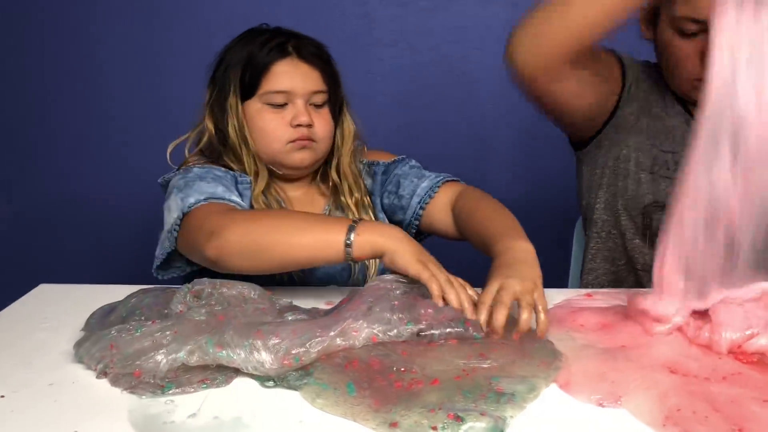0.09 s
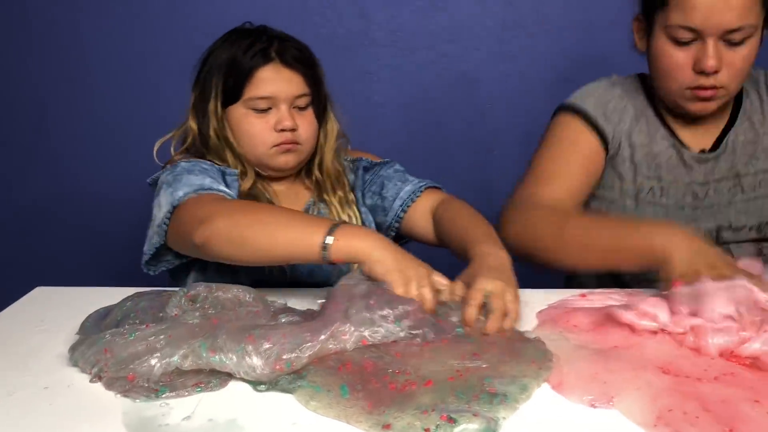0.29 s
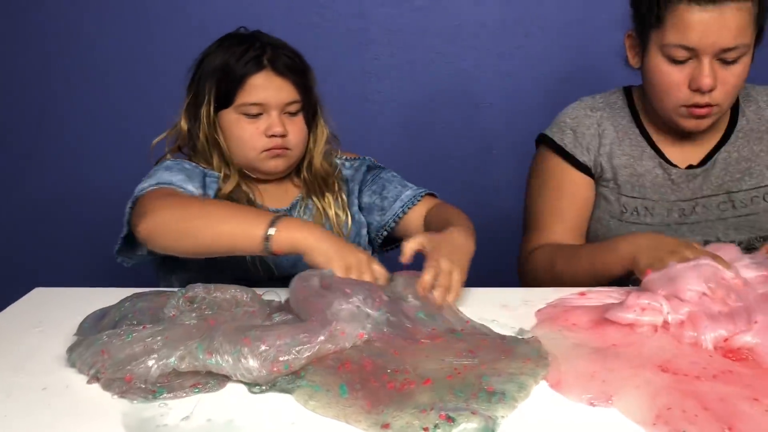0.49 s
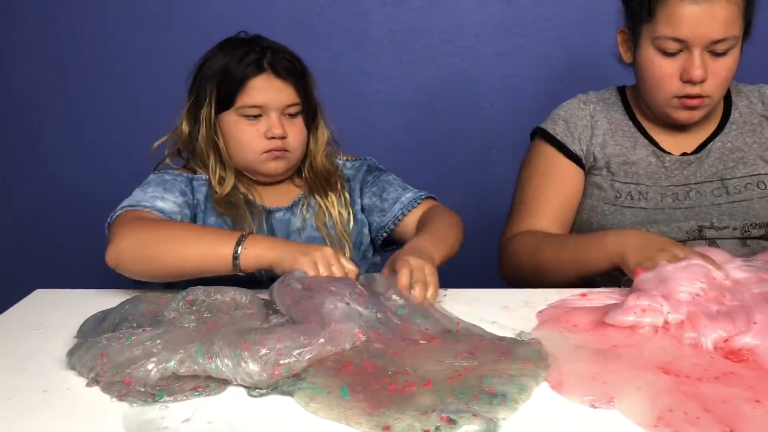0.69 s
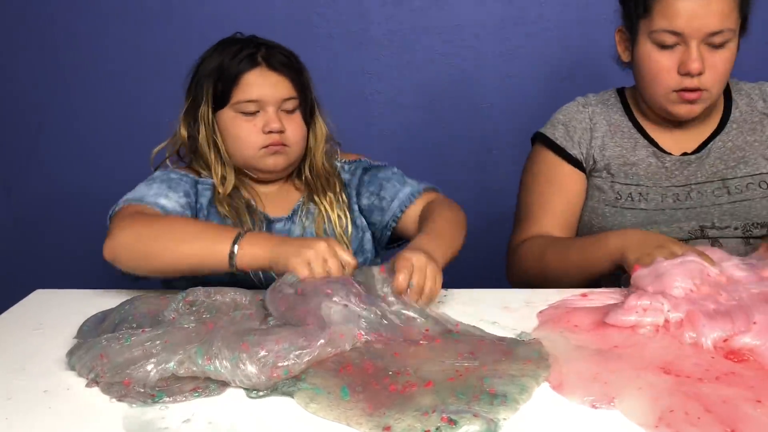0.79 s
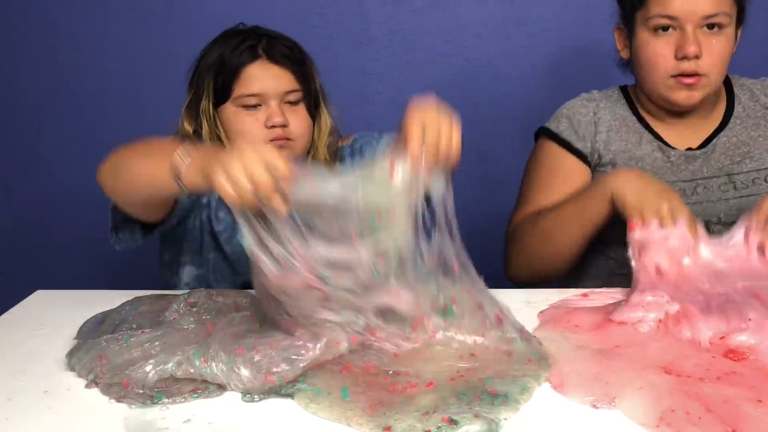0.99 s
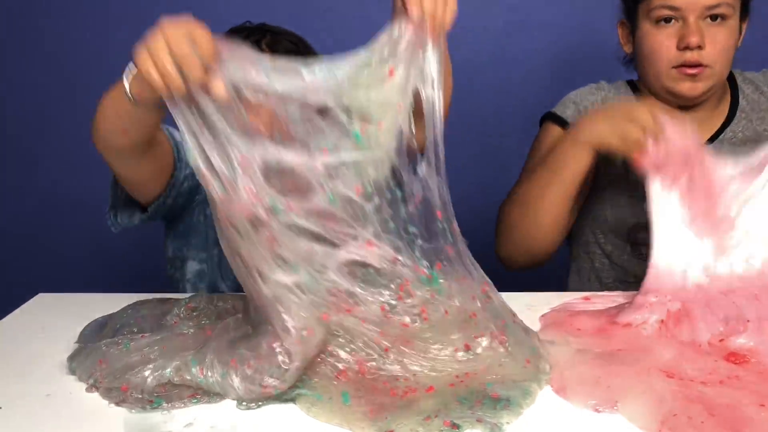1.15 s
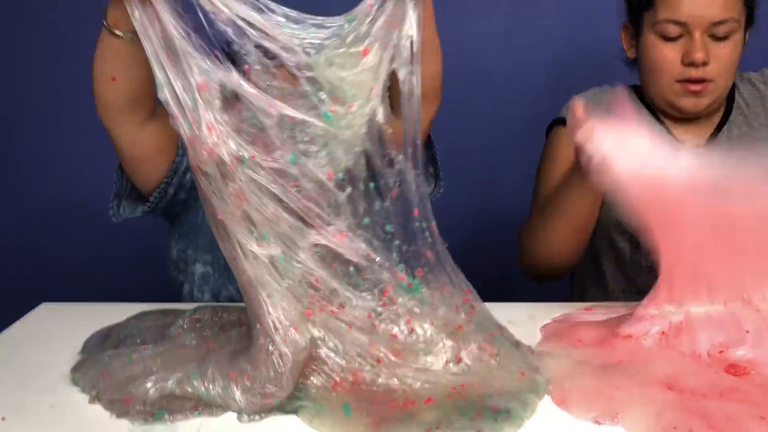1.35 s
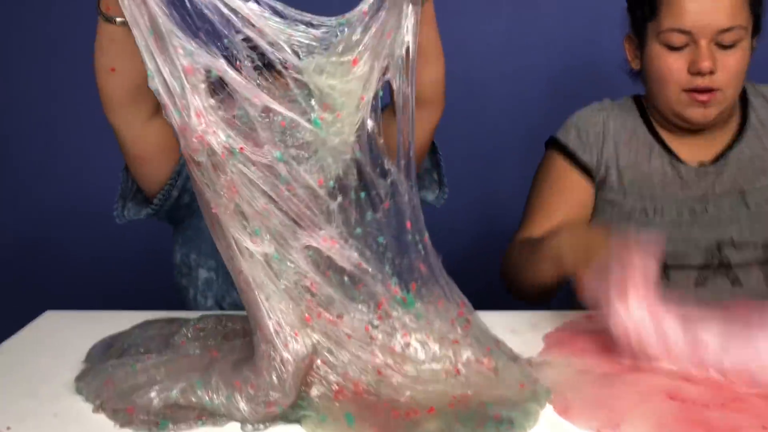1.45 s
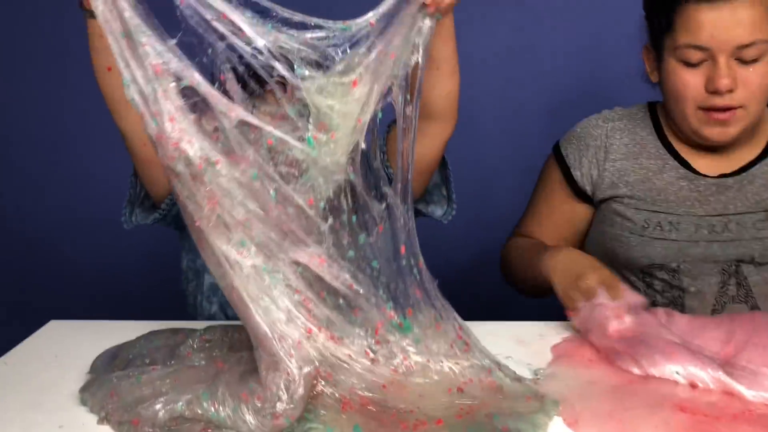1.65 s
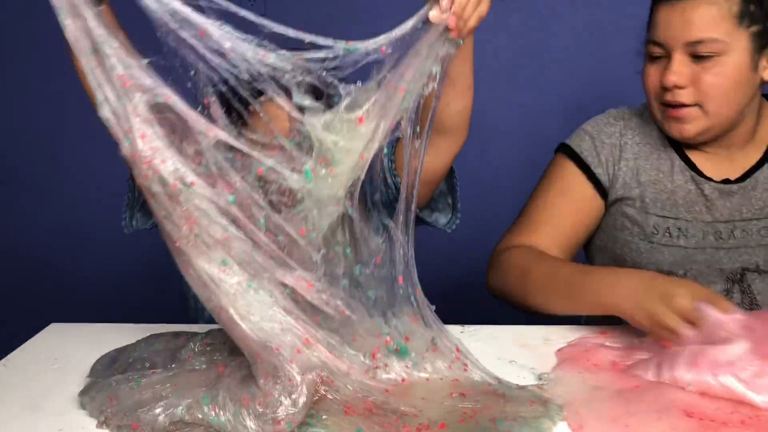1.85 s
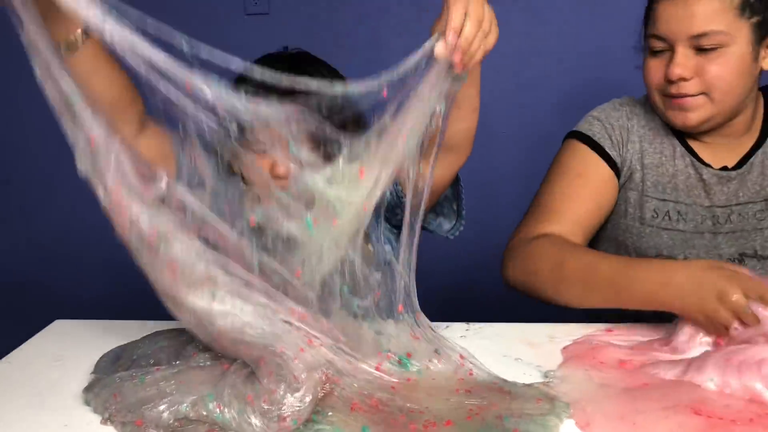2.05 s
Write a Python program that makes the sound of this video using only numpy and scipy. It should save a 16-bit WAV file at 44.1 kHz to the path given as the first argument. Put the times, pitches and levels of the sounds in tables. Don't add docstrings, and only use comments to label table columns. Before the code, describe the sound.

Thick slime full of fizzing candy is kneaded and stretched by hand, close to the microphone, with bright snapping pops over fine crackle, wet squelches and two slaps that boom the table in a bare room.

```python
import sys
import numpy as np
from scipy import signal
from scipy.fft import rfft, irfft
from scipy.io import wavfile
from scipy.ndimage import uniform_filter1d

SR = 44100
rng = np.random.default_rng(int(sys.argv[2]) if len(sys.argv) > 2 else 0)


def amplitude_ratio(level_db):
    exponent = np.asarray(level_db, float) / 20
    return 10 ** exponent


def wrap_up_sound(samples):
    columns = np.atleast_2d(samples).T
    tamed = np.clip(columns, -1, 1)
    steps = np.round(tamed * 32767).astype(np.int16)
    wavfile.write(sys.argv[1], SR, steps)


N = 92610

# start_s, crackle_level_db
WORK = [(0, -50.5), (.12, -51.5), (.24, -44.5), (.34, -46.5), (.5, -48), (0.702, -52.5), (.85, -45),
        (1.0, -45), (1.2, -46), (1.35, -45.5), (1.5, -43.5), (1.7, -41.5), (1.9, -48), (2.1, -45.5)]
# frequency_hz, level_db
CRACKLE_COLOUR = [(410, -30), (1000, -20), (2000, -8), (3550, -2.5), (4550, 2), (6920, 5.5), (9860, 2.5),
                  (14400, -6.5), (16000, -3.5)]
# start_s, squelch_level_db
SQUELCH = [(0, -65), (0.139, -62.5), (.24, -49.5), (.34, -52), (.6, -69), (.98, -53.5), (1.04, -51),
           (1.19, -53.5), (1.3, -65.5), (1.55, -54), (2.1, -64.5)]
# frequency_hz, level_db
AIR_COLOUR = [(15, -44), (30, -24), (60, 2.5), (130, 2.5), (250, 2.5), (700, -9), (1500, -2), (6000, -12),
              (16000, -12)]
# start_s, peak_level_db,
# pitch_hz, ring_cycles
POCKETS = [(0.0121, -36, 8600, 11), (0.0467, -29, 10000, 13), (0.0568, -43, 13520.0, 31.5),
           (0.0686, -27, 8800, 5.5), (0.0932, -32, 4000, 2.2), (0.1046, -24.5, 4620, 14),
           (0.1314, -20, 7800, 13), (0.1494, -17, 5580, 15), (0.1497, -21.5, 6900, 45),
           (0.9003, -33, 11000, 3), (0.1568, -24, 6260, 27), (0.1646, -29, 11200, 10.6),
           (0.2077, -16, 9700, 9.8), (0.2168, -19, 3680, 6.8), (0.2199, -18.5, 7900, 8.5),
           (0.648, -26.5, 6020, 35), (0.6627, -34, 8000, 12), (0.7461, -38, 6460.0, 10),
           (0.7673, -28, 4500, 11), (0.8197, -47, 8100, 11), (0.8465, -21.5, 8700, 7.2),
           (0.9004, -24, 2620, 8), (0.9178, -25.5, 6800, 18), (0.9361, -27, 6950, 15),
           (0.9983, -20, 10900, 11), (1.0218, -12, 12100, 15), (1.0351, -15, 10300, 8.8),
           (1.0375, -22, 9000, 19),
           (1.1311, -25.5, 9400, 19), (1.1716, -22, 4360, 19), (1.2241, -25, 8950, 4.1),
                (1.2633, -18, 4340, 19), (1.3171, -18, 5440, 14), (1.3509, -22.5, 9600, 12),
                (1.3531, -21, 5100, 15), (1.3881, -26, 3870, 10), (1.3919, -29, 2870, 6.1),
                (1.4264, -19.5, 12230.0, 11), (1.4472, -24, 4400, 2.7), (1.5098, -19.5, 5800, 13),
                (1.666, -22, 10900, 18), (1.676, -23, 5450, 13), (1.7366, -28, 7300, 17.0),
                (1.7634, -29, 4760, 12), (1.7637, -20.5, 8500, 27), (1.7688, -21.5, 7060, 36),
                (1.7759, -17, 7800, 30), (1.829, -9.5, 8660, 6.2), (1.926, -29, 9000, 8),
                (1.9927, -28.5, 2470, 8.9), (2.0297, -22, 7460, 8.7), (2.009, -32, 6000, 12),
                (2.0802, -22.5, 8100, 9.3), (2.0908, -25, 8400, 8.6),
           (0.3529, -17, 3530, 6.3), (0.3559, -6.5, 5500, 5), (0.3553, -10, 6640, 6),
          (0.357, -7.5, 9500, 6.9), (.3592, -11.5, 670, 1), (1.0219, -4, 6700, 2.6),
          (1.547, -33, 2250, 2.6), (1.5512, -23, 2000, 0.57), (1.5523, -10, 7500, 7.7),
          (1.961, -32, 5470, 12), (1.564, -12, 2410, 2.1), (1.572, -19.5, 738, 2.44),
          (1.5726, -9.5, 3470, 3.9), (2.0319, -20, 2940, 0.7), (2.0393, -32, 4900, 3.7),
           (0.0136, -30.5, 3100, 5.2), (0.0157, -39, 2480, 17), (0.0232, -34, 9700, 12),
         (0.037, -45, 11000, 5), (0.0782, -35, 4670, 10), (0.1258, -40, 12500, 8),
         (0.1326, -35.5, 1980, 2.6), (0.1415, -43, 10000, 7), (0.2644, -27.5, 6300, 6),
         (0.3361, -29, 4430, 5.3), (0.658, -40, 3850, 8), (0.729, -34, 8900, 10), (0.925, -41, 7300, 14),
         (0.9362, -22, 4560, 5.3), (0.955, -35, 8000, 8), (0.9985, -25, 13900, 18), (1.0443, -32, 8550, 14),
         (1.129, -31, 12000, 12), (1.1655, -31, 2620, 5.1), (1.2303, -31, 8500, 10),
         (1.2852, -28, 12500, 11), (1.2975, -42, 14000, 12), (1.3186, -20.5, 9900, 18),
         (1.4517, -26, 8240, 16), (1.4517, -36, 13000, 14), (1.458, -37, 6000, 11), (1.464, -35, 2960, 5.2),
         (1.5012, -39, 7600, 14), (1.508, -36, 11500, 12), (1.5255, -35, 5200, 7), (1.529, -26, 4730, 11),
         (1.8865, -38, 2020, 4.6), (1.993, -40.5, 1100, 7.9), (1.9969, -32.5, 2680, 11),
         (2.0357, -41.5, 950, 9.2),
           (1.5366, -22, 2180, 2.1), (1.5387, -26, 5200, 17), (1.5428, -29, 7500, 8), (1.542, -20, 4460, 27),
         (1.5476, -26, 8400, 9.2), (1.553, -9, 6100, 9.7), (1.5552, -28, 11900, 9), (1.5562, -15, 7300, 14),
         (1.5722, -19, 2470, 4), (1.5727, -19, 1380, 3.6)]
# frequency_hz, level_db
ROOM_COLOUR = [(60, 16.5), (250, 6.5), (700, -2), (1400, 5.5), (5000, -0.5), (9000, 2), (16000, -4)]
# frequency_hz, t60_s
ROOM_T60 = [(100, 0.19), (350, 0.46), (1000, 0.82), (2500, 0.59), (6400, 0.55), (14000, 0.3)]
# start_s, level_db, contact_cutoff_hz, weight_behind_it_db
THUDS = [
    (0.222, -61, 600, -24),
    (0.271, -49.5, 1540, -26),
    (.355, -27, 1200, -1.5),
    (0.727, -46, 300, -9),
    (0.867, -62, 1150, -9),
    (1.536, -33.5, 330, -20),
    (1.574, -25, 453, -6.5),
    (1.901, -53, 610, -14),
    (2.039, -61, 1200, -12),
    (2.086, -49, 200, 27),
]
# pitch_hz, level_db, t60_s
TABLE_MODES = [(61.4, 2, 0.12), (76, 4.5, 0.08), (131.6, -4.5, 0.45), (185.5, -4, 0.067), (242, 3, 0.068),
               (365.5, 1, 0.054), (531.5, 9.5, 0.033), (843, -13, 0.1), (1074, -7, 0.066),
               (1344, -1.5, 0.081), (1547, 8, 0.023)]
# start_s, level_db, rise_s, hold_s
SPLATS = [
    (0.3506, -18, 0.0032, 0.0014),
    (1.522, -30.5, 0.021, 0.034),
]
# frequency_hz, level_db
SPLAT_COLOUR = [(120, -52), (250, -3), (538, 4), (1500, 3.5), (3900, -2), (6400, 1), (16000, -20.5)]

CRACKLE_PER_S, CRACKLE_SPREAD_DB, CRACKLE_CYCLES = 4000, 3, 7
SQUELCH_PER_S, SQUELCH_SPREAD_DB, SQUELCH_CYCLES = 500, 3.3, 9.4
AIR_DB = -55
POP_DB, LOUD_DB = 1.5, -13
RING_SHARE, SAG = 1.44, 0.28
OVERTONE, OVERTONE_DB, OVERTONE_SPREAD_DB = 1.743, -12.5, 4
UNDERTONE, UNDERTONE_DB, UNDERTONE_SPREAD_DB = 0.806, -10.5, 4.9
SNAP_DB = -18
TOP_REACH = 3.35
ECHO_S, ECHO_DB = 0.001063, -20
ROOM_DB, ROOM_GAP_S, ROOM_BUILD_S = -8, 0.0017, 0.009
BENDING_LAG_S, BENDING_HZ = 0.0247, 128.7
TOUCH_DB, WEIGHT_HZ = 1.5, 160
SPLAT_FALL_S = 0.0085
MIC_LOW_HZ, CUTOFF_HZ, FAINT_CUTOFF_HZ = 46.7, 16900, 15950


def rms_one(x):
    return x / np.sqrt(np.mean(x ** 2) + 1e-20)


def at_hz(points, hz):
    table_hz, value = np.transpose(points)
    return np.interp(np.log(hz), np.log(table_hz), value)


def over_time(points):
    return amplitude_ratio(np.interp(np.arange(N) / SR, *np.transpose(points)))


def colour(x, spectrum):
    hz = np.fft.rfftfreq(len(x), 1 / SR) + 1
    return irfft(rfft(x) * amplitude_ratio(at_hz(spectrum, hz)), len(x))


def butter(x, order, hz, kind):
    return signal.sosfilt(signal.butter(order, hz, kind, fs=SR, output="sos"), x)


def cut(x, hz):
    return signal.sosfiltfilt(signal.cheby2(14, 30, hz, fs=SR, output="sos"), x)


def drift(rate):
    return rms_one(np.interp(np.arange(N) * rate / SR, np.arange(400), rng.standard_normal(400)))


def ring(clicks, hz, t60):
    r, w = amplitude_ratio(-60 / (t60 * SR)), 2 * np.pi * hz / SR
    return signal.lfilter([0, np.sin(w)], [1, -2 * r * np.cos(w), r * r], clicks + 1e-18)


def add(out, s, sound):
    i = int(s * SR)
    out[i:i + len(sound)] += sound[:len(out) - i]


def grains(per_s, spread_db, low_hz, high_hz, cycles):
    sizes = amplitude_ratio(spread_db * np.minimum(rng.exponential(1, N), 4)) * rng.choice([-1, 1], N)
    born = rng.random(N) < per_s * amplitude_ratio(4 * drift(25)) / SR
    dealt = rng.integers(0, 16, N)
    out = np.zeros(N)
    for k, hz in enumerate(np.geomspace(low_hz, high_hz, 16)):
        out += ring(sizes * born * (dealt == k), hz, cycles / hz) * np.sqrt(hz)
    return rms_one(out)


def crackle():
    bubbles = grains(CRACKLE_PER_S, CRACKLE_SPREAD_DB, 925, 17200, CRACKLE_CYCLES)
    return over_time(WORK) * rms_one(colour(bubbles, CRACKLE_COLOUR))


def squelch():
    return over_time(SQUELCH) * grains(SQUELCH_PER_S, SQUELCH_SPREAD_DB, 370, 1364, SQUELCH_CYCLES)


def room_air():
    return amplitude_ratio(AIR_DB) * rms_one(colour(rng.standard_normal(N), AIR_COLOUR))


def pop(hz, cycles):
    t = np.arange(600) / SR
    turn = 2 * np.pi * np.cumsum(1 + SAG * (np.exp(-t * hz / 2) - 0.5)) / SR
    fade = amplitude_ratio(-60 * t * hz / (RING_SHARE * max(cycles, 0.5))) * np.clip(t * hz * 2, 0, 1)
    over_chance, over_shift, under_chance, under_shift = rng.uniform(-1, 1, 4)
    over_hz = min(hz * OVERTONE * (1 + 0.24 * over_shift), 0.33 * SR)
    under_hz = hz * UNDERTONE * (1 + 0.098 * under_shift)
    over = amplitude_ratio(OVERTONE_DB + OVERTONE_SPREAD_DB * over_chance) * np.sin(turn * over_hz)
    under = amplitude_ratio(UNDERTONE_DB + UNDERTONE_SPREAD_DB * under_chance) * np.sin(turn * under_hz)
    sound = (np.sin(turn * hz) + over + under) * fade
    sound[:8] += amplitude_ratio(SNAP_DB) * np.diff(rng.uniform(-1, 1, 9)) * 2
    sound = butter(sound, 2, 0.25 * hz, "high")
    sound = butter(sound, 2, min(TOP_REACH * hz, 0.45 * SR), "low")
    return sound / np.abs(sound).max()


def pops():
    loud, faint = np.zeros(N), np.zeros(N)
    for s, db, hz, cycles in POCKETS:
        add(faint if db < LOUD_DB else loud, s, amplitude_ratio(db + POP_DB) * pop(hz, cycles))
    return loud, faint


def bounce(x):
    return x + amplitude_ratio(ECHO_DB) * np.roll(x, int(ECHO_S * SR))


def room(x):
    t, tail = np.arange(SR) / SR, np.zeros(SR)
    edges = 60 * 2 ** np.arange(0, 8.6, 0.25)
    for low, high in zip(edges, edges[1:]):
        band = butter(rng.standard_normal(SR), 2, [low, min(high, 0.45 * SR)], "band")
        t60 = at_hz(ROOM_T60, np.sqrt(low * high))
        tail += band * amplitude_ratio(at_hz(ROOM_COLOUR, low) - 60 * t / t60)
    tail *= np.clip((t - ROOM_GAP_S) / ROOM_BUILD_S, 0, 1)
    return signal.fftconvolve(x, tail / np.sqrt(np.sum(tail ** 2)))[:N]


def table_mode(delay_s, level, hz, t60):
    push = np.zeros(SR // 2)
    push[max(int(delay_s * SR), 0)] = level
    swell = np.hanning(int(2.5 * SR / hz))
    wave = np.cos(2 * np.pi * hz * np.arange(len(swell)) / SR)
    sound = np.convolve(ring(push, hz, t60), swell * wave * 2 / swell.sum())
    return sound[len(swell) // 2:][:SR // 2]


def table():
    out = np.zeros(N)
    for s, db, cut_hz, weight_db in THUDS:
        for hz, mode_db, t60 in TABLE_MODES:
            level_db = db + mode_db + TOUCH_DB * rng.normal() + weight_db * (hz < WEIGHT_HZ)
            level = amplitude_ratio(level_db) / (1 + (hz / cut_hz) ** 2)
            delay_s = BENDING_LAG_S * (np.sqrt(BENDING_HZ / hz) - 0.3)
            add(out, s, table_mode(delay_s, level, hz, t60))
    return out


def splats():
    t, shape = np.arange(N) / SR, np.zeros(N)
    for s, db, rise, hold in SPLATS:
        swell = np.clip((t - s) / rise, 0, 1) ** 2
        shape += amplitude_ratio(db) * swell * np.exp(-np.maximum(t - s - rise - hold, 0) / SPLAT_FALL_S)
    ragged = amplitude_ratio(3.0 * uniform_filter1d(rng.standard_normal(N), size=36) * 7)
    return shape * rms_one(ragged * colour(rng.standard_normal(N), SPLAT_COLOUR))


def scene():
    loud, faint = pops()
    knocks = table()
    soft = splats() + crackle() + squelch()
    far = amplitude_ratio(ROOM_DB) * room(loud + faint + soft + knocks)
    diffuse = bounce(faint) + soft + far + room_air()
    return (bounce(loud) + knocks + cut(diffuse, FAINT_CUTOFF_HZ))[None]


def band_limit(x):
    return signal.sosfilt(signal.butter(12, 16980, fs=SR, output="sos"), x)


def record(dry):
    thin = butter(dry, 2, MIC_LOW_HZ, "high")
    return band_limit(cut(thin, CUTOFF_HZ))


dry = scene()
out = record(dry)
wrap_up_sound(out)
```